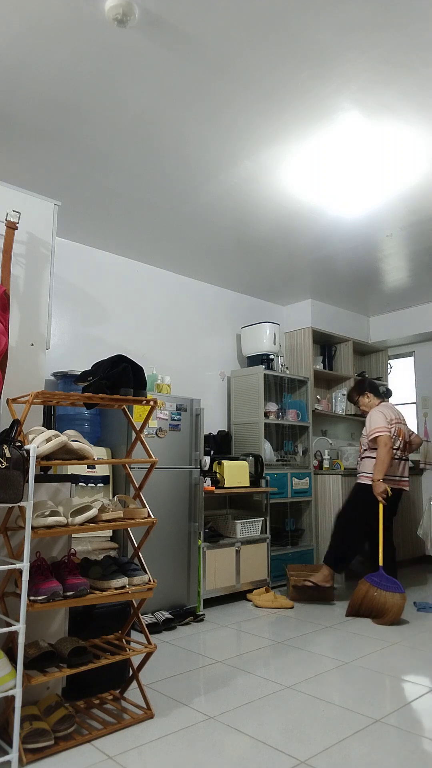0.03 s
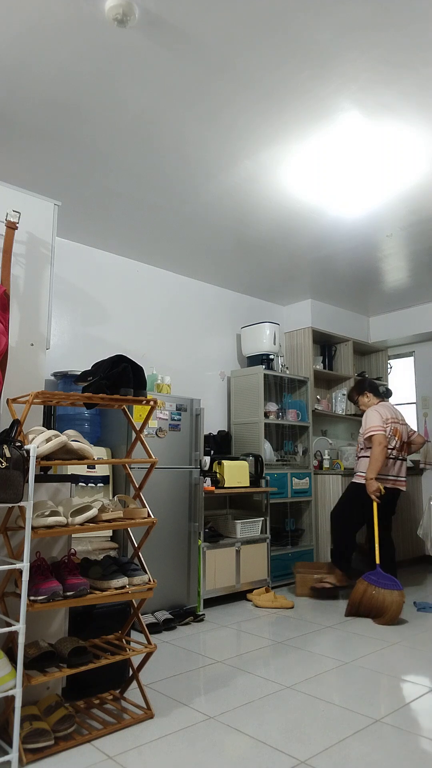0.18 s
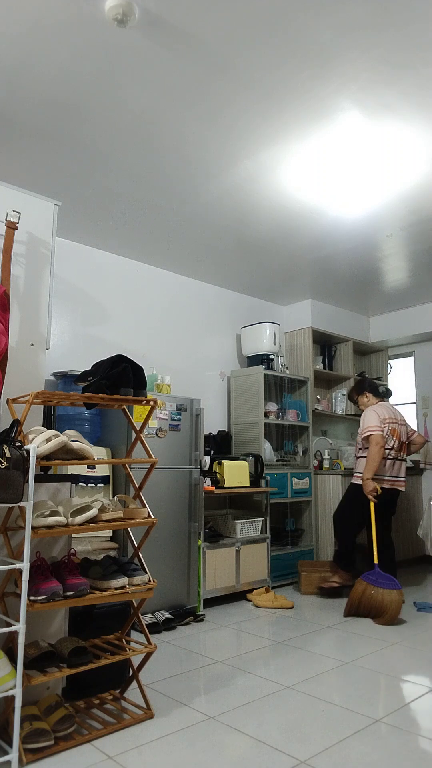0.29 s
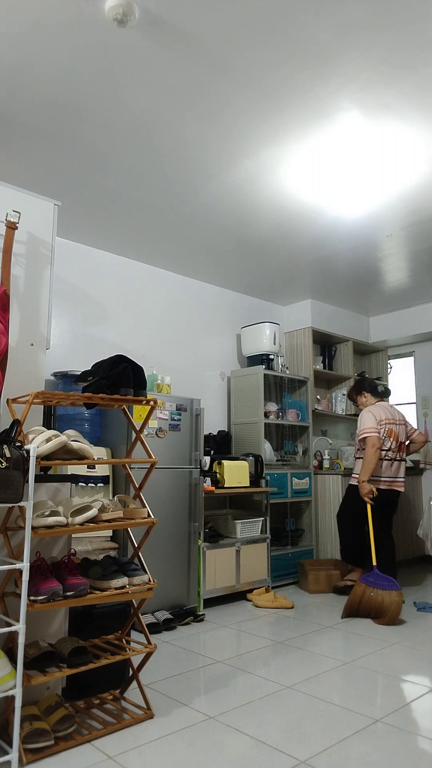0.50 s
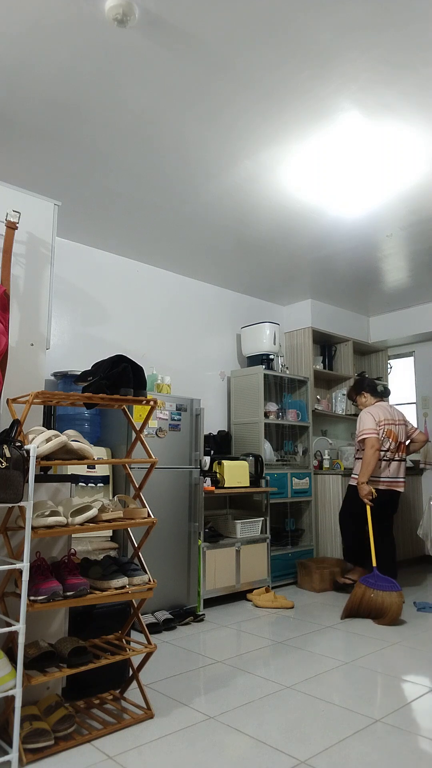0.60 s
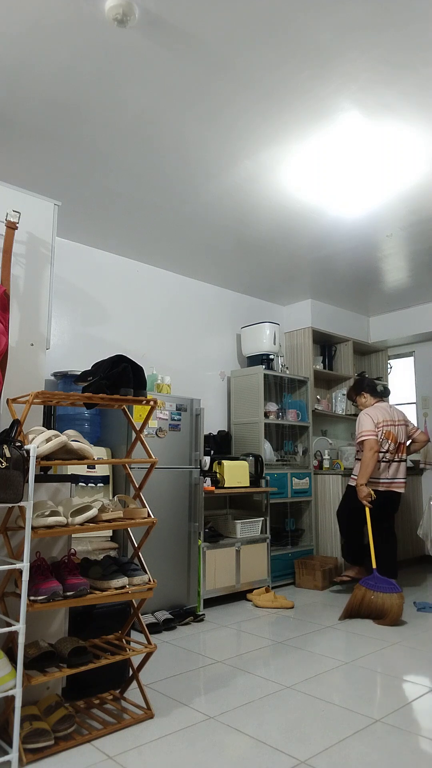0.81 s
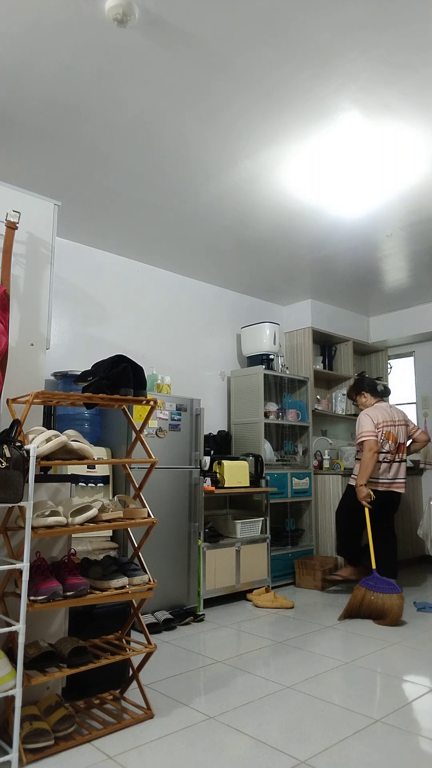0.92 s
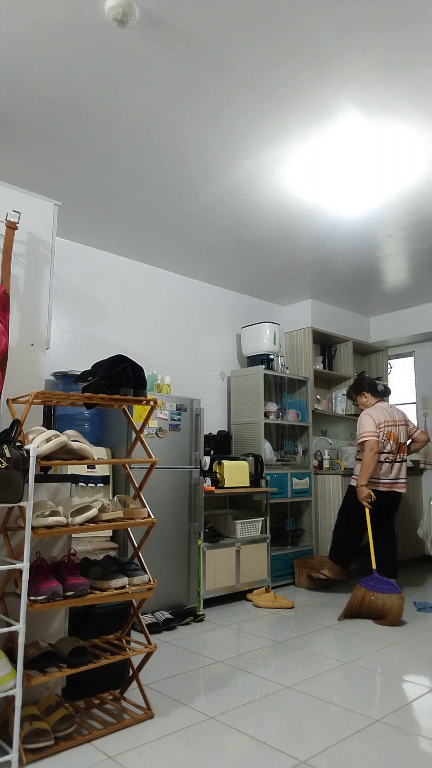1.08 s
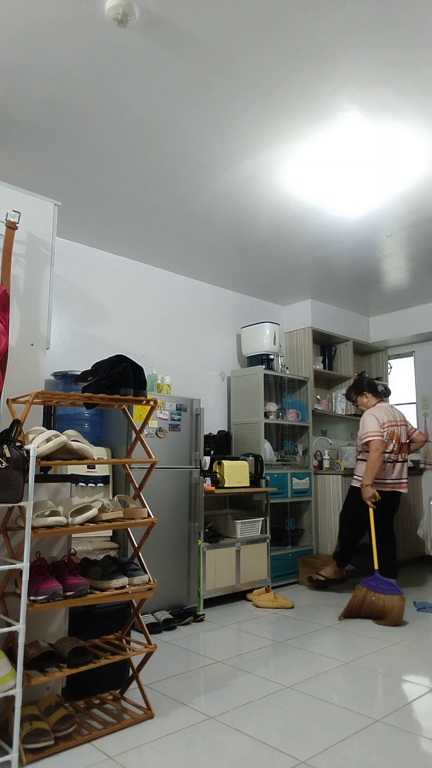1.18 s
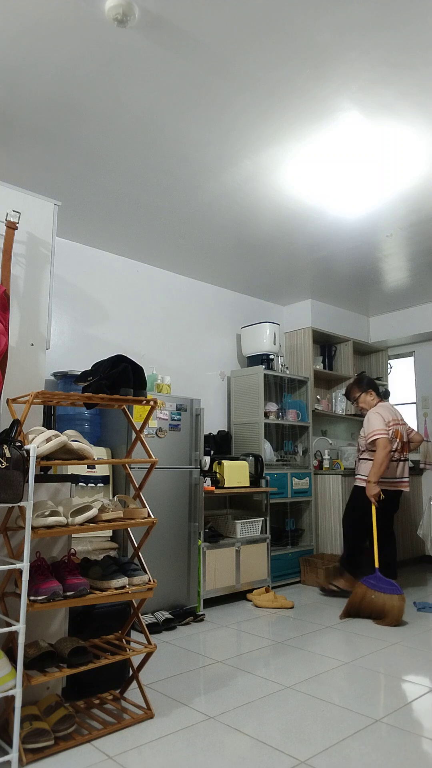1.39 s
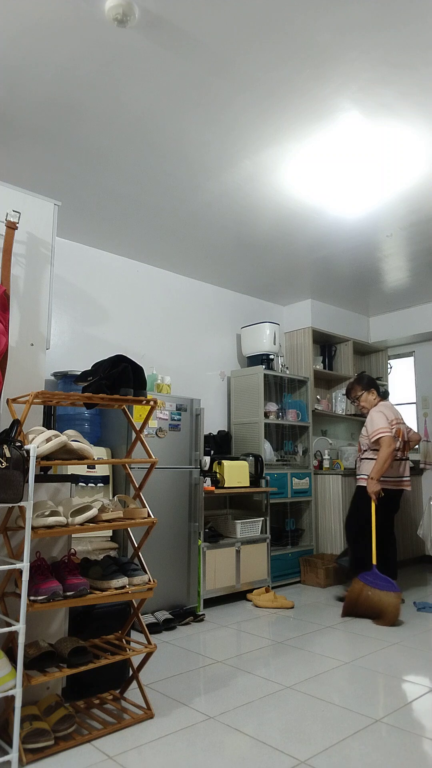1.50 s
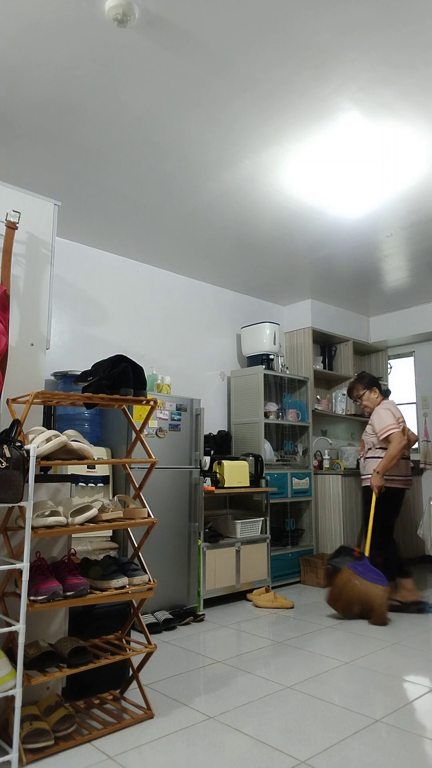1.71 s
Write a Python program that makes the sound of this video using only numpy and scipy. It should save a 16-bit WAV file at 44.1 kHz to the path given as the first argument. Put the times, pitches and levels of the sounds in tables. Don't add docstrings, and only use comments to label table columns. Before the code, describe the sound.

A soft broom sweeps kitchen tiles over low appliance rumble and faint hiss. A slight slipper scuff comes at 0.1 s, then bristles drag from 0.23 s as the broom bumps a hollow, booming dustpan. At 0.65 s the pan knocks and rings with another scuff. A sharp scuff at 1.02 s precedes the hardest sweep, loudest scuffs and dull heel thuds around 1.27 s, fading by 1.65 s with short hard-room echo.

```python
import sys
import numpy as np
from scipy import signal
from scipy.fft import rfft, irfft, next_fast_len
from scipy.io import wavfile
from scipy.ndimage import uniform_filter1d, map_coordinates

SR = 44100
rng = np.random.default_rng(int(sys.argv[2]) if len(sys.argv) > 2 else 0)


def ratio(d):
    e = np.asarray(d, float) / 20
    return 10 ** e


def waveform_to_disk(signal):
    frames = np.transpose(np.atleast_2d(signal))
    scaled = np.clip(frames, -1, 1) * 32767
    samples = np.round(scaled).astype(np.int16)
    wavfile.write(sys.argv[1], SR, samples)


N = 79380

# time_s, pressure_db, stalk_share_db
BROOM_STROKE = [(0.2, -67, -6), (0.208, -78, 8), (0.228, -40.5, 1.5), (0.296, -36, -7.5), (0.532, -39, -12),
                (0.642, -50, 1), (0.662, -37, 0.5), (0.818, -44, 0), (0.914, -42, -3.5), (0.996, -47.5, -4),
                (1.032, -42, 13), (1.196, -72, 1), (1.228, -79, -13), (1.244, -37.5, -8), (1.272, -29.5, 9),
                (1.31, -35.5, -20), (1.55, -44.5, -1.5), (1.66, -64, -4)]
# frequency_hz, level_db
BRISTLE_COLOUR = [(700, -45), (1500, -17), (2250, -2), (3700, -0.5), (5800, -2), (8900, -3), (10700, -17),
                  (12000, -42)]
# frequency_hz, level_db
STALK_COLOUR = [(200, -26), (500, -3), (1000, -1), (1700, -0.5), (2500, -17), (4000, -39), (9000, -67)]
# start_s, level_db, rise_s,
# decay_t60_s, centre_hz
SLIPPER_SCUFFS = [(0.125, -48, 0.001, 0.43, 1970), (0.65, -33.5, 0.003, 0.14, 1420),
                  (0.654, -34.5, .003, 0.23, 4330), (.74, -43, 0.014, 0.18, 1390),
                  (.855, -38, 0.0021, 0.063, 1460), (0.879, -45, 0.0021, 0.18, 5800),
                  (0.919, -37, .004, 0.086, 5500), (1.009, -49, 0.0023, 0.11, 2040),
                  (1.022, -24, 0.0092, 0.063, 1900), (1.036, -39, 0.0022, 0.27, 2550),
                  (1.05, -39, 0.012, 0.55, 810), (1.244, -64, 0.0033, .1, 2330),
                  (1.264, -20.5, 0.0057, 0.18, 1760), (1.277, -31, 0.0013, 0.31, 3240),
                  (1.263, -29.5, 0.013, 0.51, 810), (1.266, -32, 0.0021, 0.39, 4000),
                  (0.653, -31, .003, 0.44, 387), (1.27, -29.5, 0.0086, 0.32, 229),
                  (1.05, -43, .015, 0.31, 190), (1.515, -47, .002, .06, 2360),
                  (1.06, -55, 0.014, 0.16, 7400), (1.295, -30, 0.004, 0.31, 398),
                  (1.363, -31.5, 0.0074, 0.19, 1760), (1.482, -40, 0.00093, 0.055, 2440)]
# start_s, level_db
PAN_NUDGES = [
    (.2162, -31.5),
    (.2215, -22),
    (.2335, -29),
    (.2388, -20.5),
    (.2485, -32),
    (.261, -40),
]
# frequency_hz, level_db, decay_t60_s
PAN_NUDGE_MODES = [(109.3, -17, 0.21), (279, -3.5, .06), (436, -1, 0.078), (550, -9.5, 0.028),
                   (620, -16, 0.098), (737, -14.5, 0.056)]
# start_s, level_db
PAN_KNOCKS = [
    (.6505, -23.5),
    (.6525, -35.5),
    (.6915, -37.5),
]
# frequency_hz, level_db, decay_t60_s
PAN_KNOCK_MODES = [(118, -6.5, 0.088), (202, -10, 0.11), (264, -0.5, 0.092), (350, -0.5, 0.089),
                   (410, -8.5, 0.35), (464.5, -3.5, 0.3), (523, -5.5, 0.44), (589, -12, 0.33),
                   (660, -27, 0.34), (776, -7, 0.11), (994, -15, .08), (1203, -3.5, 0.043),
                   (1545, -18.5, 0.27)]
# start_s, level_db
HEEL_THUDS = [(.47, -45.5), (.52, -48), (.68, -38), (1.24, -35.5), (1.296, -31.5), (1.335, -39),
              (1.36, -36.5), (1.0, -52), (1.06, -47), (1.5, -43.5), (1.635, -56)]
# frequency_hz, level_db, decay_t60_s
FLOOR_MODES = [(56.5, -11, 0.18), (92, 0, 0.16), (114.6, 4, 0.2), (184, -4.5, 0.19), (238, -9.5, 0.21),
               (349, -7.5, 0.26)]
# frequency_hz, level_db
RUMBLE_COLOUR = [(18, -50), (30, -25.5), (118, -12.5), (227, -9.5), (355, -12), (383, -15.5), (538, -16.5),
                 (841, -23), (1200, -26.5), (1560, -42), (2640, -120)]
# frequency_hz, width_hz, boost_db
ROOM_MODES = [(55, 20, 9), (102.2, 6.7, 8.5), (185, 23, 4), (231.3, 10.7, 10.5), (297, 11, 6.5),
              (345.6, 18, 6.5), (430, 20, 4)]
# frequency_hz, level_db
AIR_COLOUR = [(470, -34), (800, -25), (1200, -4), (3210, -5.5), (3500, -7), (6120, -19), (7200, -11),
              (10500, -19.5), (13600, -73), (22000, -120)]
# frequency_hz, decay_t60_s
KITCHEN_DECAY = [(200, 0.54), (2000, 0.41), (10000, 0.37)]
# frequency_hz, level_db
MIC_RESPONSE = [(20, -25), (35, -7), (55, -1), (9000, 0.5), (10600, -9)]

TICKS_PER_S, TICK_SPREAD_DB = 9000, 2.2


def unit(x):
    return x / np.sqrt(np.mean(x ** 2) + 1e-20)


def along(points, hz):
    f, v = np.transpose(points)
    return np.interp(np.log(hz + 1), np.log(f + 1), v)


def filtered(x, response):
    m = next_fast_len(N + SR // 2)
    return irfft(rfft(x, m) * response(np.fft.rfftfreq(m, 1 / SR)), m)[..., :N]


def coloured(x, colour):
    return unit(filtered(x, lambda hz: ratio(along(colour, hz))))


def wobble(rate):
    knots = rng.standard_normal(int(N * 200 / SR) + 4)
    return map_coordinates(knots, [np.arange(N) * rate / SR])


def patchy(patchy_db):
    z = signal.stft(rng.standard_normal(N + 512), nperseg=256)[2]
    across_hz = uniform_filter1d(rng.standard_normal(z.shape), size=4, axis=0)
    patches = unit(uniform_filter1d(across_hz, size=10, axis=1))
    return unit(signal.istft(z * ratio(patchy_db * patches), nperseg=256)[1][:N])


def grit(per_s, spread_db):
    chance, sign, size = rng.random((3, N))
    ticks = (chance < per_s / SR) * np.sign(sign - 0.5)
    return unit(ticks * ratio(-spread_db * np.log(size + 1e-9)))


def struck(contacts, modes, attack_s, scatter_db):
    out = np.zeros(N + SR)
    t = np.arange(SR // 2) / SR
    for start_s, hit_db in contacts:
        ring = np.zeros(len(t))
        for k, (hz, mode_db, t60) in enumerate(modes):
            level_db = hit_db + mode_db + scatter_db * rng.standard_normal()
            polarity = (-1) ** k
            ring += polarity * ratio(level_db - 60 * t / t60) * np.sin(2 * np.pi * hz * t)
        out[round(start_s * SR):][:len(t)] -= ring * (1 - np.exp(-t / attack_s))
    return out[:N]


def bristle_slips():
    hiss_share = 0.6
    hiss = patchy(patchy_db=1.9)
    return hiss_share * hiss + (1 - hiss_share) * grit(TICKS_PER_S, TICK_SPREAD_DB)


def broom():
    time_s, pressure_db, stalk_db = np.transpose(BROOM_STROKE)
    t = np.arange(N) / SR
    tips = coloured(bristle_slips(), BRISTLE_COLOUR)
    stalks = coloured(bristle_slips(), STALK_COLOUR)
    rasp = stalks * ratio(np.interp(t, time_s, stalk_db) - 5)
    tremble_db = 0.5 * wobble(60.1)
    stroke_db = np.interp(t, time_s, pressure_db, -90, -90) + 1.4
    return (tips + rasp) * ratio(stroke_db + tremble_db)


def slippers():
    out = np.zeros(N)
    t = np.arange(N) / SR
    clumps = ratio(2.25 * wobble(150))
    for start_s, level_db, rise_s, t60, centre_hz in SLIPPER_SCUFFS:
        width_hz = 1.1 * centre_hz

        def sole(f):
            band = 1j * f * width_hz / (centre_hz ** 2 - f ** 2 + 1j * f * width_hz)
            low_body = ratio(-26) / (1 + 1j * f / 900)
            return band ** 2 + low_body

        rub = grit(TICKS_PER_S / 2, TICK_SPREAD_DB) + rng.standard_normal(N)
        burst = unit(filtered(rub, sole))
        age = np.maximum(t - start_s, 0)
        swell = 1 - np.exp(-age / rise_s)
        out += ratio(level_db - 60 * age / t60) * swell * burst * clumps
    return out


def dustpan():
    nudge = struck(PAN_NUDGES, PAN_NUDGE_MODES, attack_s=0.00044, scatter_db=1)
    knock = struck(PAN_KNOCKS, PAN_KNOCK_MODES, attack_s=0.0011, scatter_db=1.2)
    return nudge + knock


def heels():
    return struck(HEEL_THUDS, FLOOR_MODES, attack_s=0.0029, scatter_db=2.4)


def mirrored(hz):
    delay_s, gain, dip_hz = 0.000312, 0.27, 1050
    return 1 - gain * np.exp(-2j * np.pi * (hz - dip_hz) * delay_s)


def kitchen(x):
    hz, t, z = signal.stft(rng.standard_normal(SR // 2), SR, nperseg=256)
    decay = ratio(-60 * t / along(KITCHEN_DECAY, hz)[:, None])
    tail = signal.istft(z * decay, SR, nperseg=256)[1]
    delayed = np.pad(x, (200, 0))
    return signal.fftconvolve(delayed, tail / np.linalg.norm(tail))[:N]


def rumble_response(f):
    boost_db = sum(db / (1 + (2 * (f - c) / w) ** 2) for c, w, db in ROOM_MODES)
    return ratio(along(RUMBLE_COLOUR, f) + boost_db)


def background():
    rumble = unit(filtered(rng.standard_normal(N), rumble_response))
    hiss = coloured(patchy(patchy_db=0.7), AIR_COLOUR)
    return rumble * ratio(-43 + 0.43 * wobble(4.6)) + hiss * ratio(-56)


def scene():
    rubbing = broom() + slippers()
    rubbing = filtered(rubbing + ratio(-11.5) * kitchen(rubbing), mirrored)
    hits = dustpan() + heels()
    hits = hits + ratio(-8) * kitchen(hits)
    return (ratio(-0.5) * rubbing + hits + background())[None]


def top_cut(x):
    return signal.sosfilt(signal.butter(12, 15480, fs=SR, output="sos"), x)


def record(dry):
    top_hz = 10830
    band = filtered(dry, lambda hz: ratio(along(MIC_RESPONSE, hz)) * (hz < top_hz))
    shifted = band * np.cos(2 * np.pi * 6500 * np.arange(N) / SR)
    ghost = filtered(shifted, lambda hz: (hz > 12900) & (hz < 15480))
    return top_cut(band + ratio(-32) * ghost)


dry = scene()
out = record(dry)
waveform_to_disk(out)
```